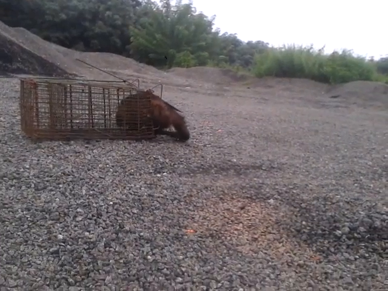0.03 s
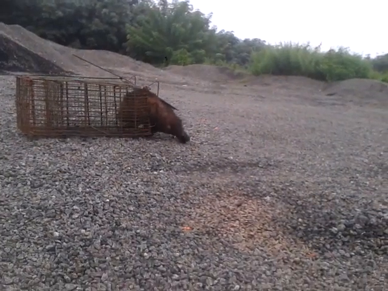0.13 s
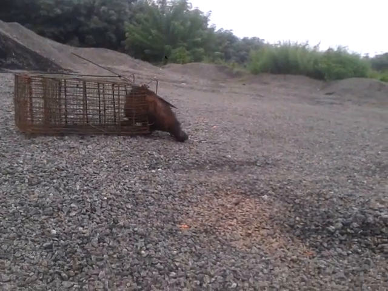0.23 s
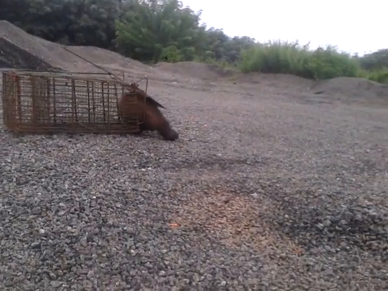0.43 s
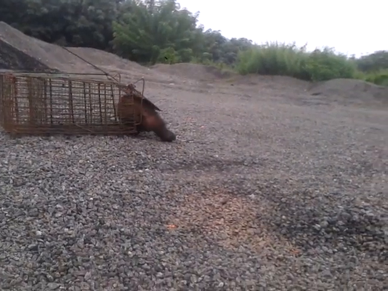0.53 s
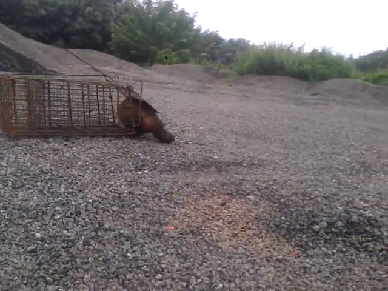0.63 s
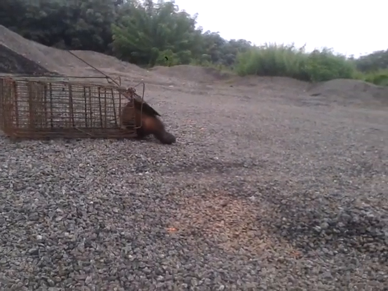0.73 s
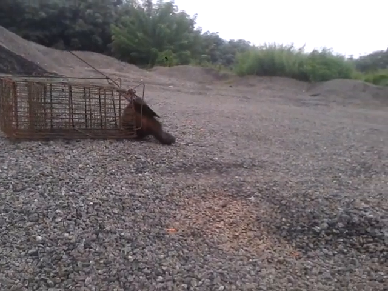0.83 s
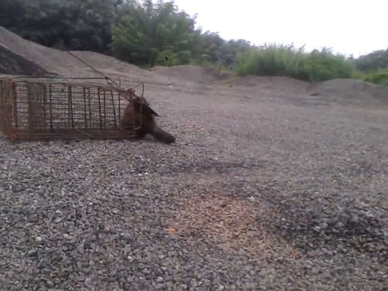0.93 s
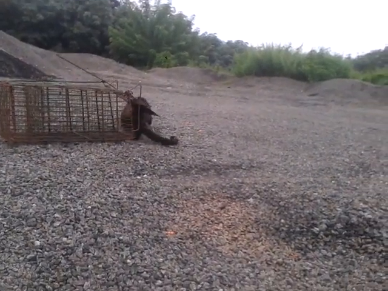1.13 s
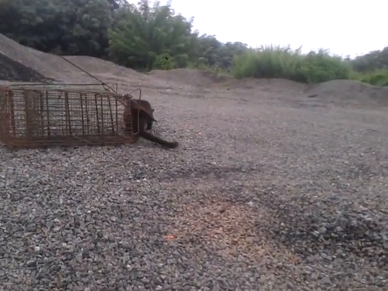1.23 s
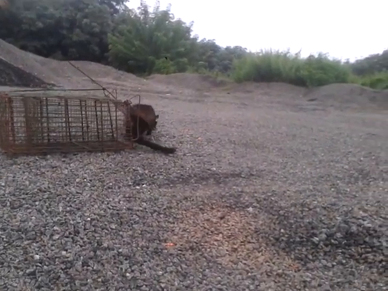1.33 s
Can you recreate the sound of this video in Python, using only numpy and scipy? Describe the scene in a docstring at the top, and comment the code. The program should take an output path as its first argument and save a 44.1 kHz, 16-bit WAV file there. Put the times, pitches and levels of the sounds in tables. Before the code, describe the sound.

An animal gives two thin, buzzing calls nearby, from about 0.2 to 0.5 seconds and 0.9 to 1.2 seconds. Each falls in pitch, joined by a higher tone near its end. A wire cage knocks lightly in the first 0.3 seconds, loudest at 0.5, and again near 1 second. Gravel clicks faintly throughout, over quiet outdoor hiss, faint insects and a distant low drone.

```python
"""On open gravel, by a wire cage, an animal gives two thin, buzzing, falling calls.
Each call is a tone chopped into fast pulses, joined near its end by a second, higher voice.
Knocks set the cage wire ringing, and the gravel shifts in tiny clicks of stone on stone.
Behind lie airy hiss, a distant drone, insects and a low rumble, all shaped from noise."""
import sys
import numpy as np
from scipy import signal
from scipy.fft import rfft, irfft
from scipy.io import wavfile
from scipy.ndimage import uniform_filter1d

SR = 44100
rng = np.random.default_rng(int(sys.argv[2]) if len(sys.argv) > 2 else 0)


def output_pcm(signal):
    """Save a mono or channel-first signal as 16-bit PCM at the path in sys.argv[1].

    Samples are clipped to [-1, 1] before scaling.
    """
    pcm = np.clip(np.atleast_2d(signal).T, -1, 1) * 32767
    wavfile.write(sys.argv[1], SR, np.round(pcm).astype(np.int16))


N = 61739

# tone colour of the open air: (frequency [Hz], relative level [dB])
AIR_COLOUR = [(25, -38), (60, -13.5), (120, -22.5), (220, -12), (320, -6), (450, 2.5), (650, -4.5),
              (900, -10.5), (1400, -7.5), (2300, -13.5), (4000, -12), (5600, -17), (7000, -17),
              (11500, -18.5), (15500, -15.5)]
# two bands of drone, then two of insects: (centre [Hz], width to each side [Hz], base level [dB])
BANDS = [(415.7, 12.8, -66), (328, 18, -72), (3054, 160, -68.5), (5090, 334, -66)]
# air, drone and insects swell together: (time [s], level change [dB])
SWELL = [(0, -4.5), (.15, -1.5), (.5, 0.13), (.7, -1.4), (1.0, 1), (1.4, -2.5)]
# the rumble's rise and fall: (time [s], level [dB])
RUMBLE_LEVELS = [(0, -66), (.14, -66), (.25, -77.5), (.47, -79.5), (.56, -69), (.82, -72.5), (.97, -79.5),
                 (1.119, -90), (1.2, -65), (1.28, -77.5), (1.4, -65.5)]
# knocks on the cage: (time [s], low [dB], middle [dB], high [dB], top [dB], ring against click [dB])
KNOCKS = [(0.101, -16, -16.5, -27.5, -34, -32), (0.1613, -22.5, -17, -31, -53, -26),
          (0.2689, -16, -19, -20, -30, -57), (.439, -40, -27, -23, -37, -45),
          (0.4891, -4.5, -9, -15, -30.5, -38), (0.963, -16, -14, -34, -55, -30)]
# points where a knock's tone colour is set: (frequency [Hz])
KNOCK_HZ = [60, 250, 450, 850, 1600, 2400, 3900, 4700, 5600, 8500, 13000]
# ringing notes of the wire: (pitch [Hz], relative level [dB], time to fade by 60 dB [s])
WIRE_NOTES = [(870, 3, 0.0059), (1507, 4, 0.02), (2320, -14, 0.0085), (4550, 9, 0.0075), (5100, -8, 0.057)]
# gravel shifts and soft rustles: (time [s], length [s], level [dB], strongest frequency [Hz])
SCUFFS = [(0.175, 0.012, -61, 3120), (0.478, 0.049, -82, 3000), (0.721, 0.01, -62.5, 2500),
          (0.809, 0.047, -64, 3700), (0.844, 0.028, -60, 820), (0.852, 0.025, -62, 2800),
          (1.035, 0.049, -64.5, 2330), (1.128, 0.023, -64.5, 2680), (1.276, 0.019, -60, 3220)]
# slides that open the calls: (time [s], length [s], first pitch [Hz], last pitch [Hz], level [dB])
SLIDES = [(0.193, 0.05, 1154, 1430, -59), (0.841, 0.056, 990, 1393, -61)]
# main voice of each call: (time [s], pitch [Hz], level [dB])
MAIN_A = [(.2239, 1483, -55), (.245, 1531, -39.5), (.262, 1506, -36.5), (.285, 1430, -31),
          (.32, 1396, -32.5), (.35, 1387, -34), (.39, 1333, -39.5), (.42, 1260, -46.5), (.445, 1200, -47.5),
          (.475, 1113, -52.5)]
MAIN_B = [(.8787, 1506, -52), (.899, 1489, -43), (.905, 1559, -38), (.94, 1417, -32.5), (.97, 1390, -32.5),
          (1.005, 1358, -34.5), (1.04, 1308, -39.5), (1.07, 1246, -42.5), (1.11, 1159, -50.5),
          (1.145, 1096, -50.5)]
# higher voice of each call: (time [s], pitch [Hz], level [dB])
UPPER_A = [(.35, 1989, -60), (.385, 1920, -65), (.41, 1822, -55), (.447, 1704, -48.5), (.46, 1572, -51),
           (.47, 1472, -41.5), (.481, 1463, -42.5), (.492, 1320, -72)]
UPPER_B = [(1.03, 1860, -55), (1.05, 1826, -57.5), (1.08, 1759, -53.5), (1.11, 1690, -50),
           (1.122, 1562, -51.5), (1.13, 1550, -45.5), (1.141, 1536, -47.5), (1.153, 1370, -61)]
# single stones tapping: (time [s], level [dB])
STONE_TAPS = [(.3238, -48), (.5749, -43.5)]
# ringing notes of a stone: (pitch [Hz], relative level [dB], time to fade by 60 dB [s])
STONE_NOTES = [(3400, -14, .009), (3850, -0.5, 0.0073), (4350, -8, 0.0095), (6040, -2, 0.0037)]

TIME = np.arange(N) / SR


def amp(db):
    """Turns decibels into a number to multiply a sound by."""
    return 10 ** (np.asarray(db) / 20)


def unit(x):
    """Scales a signal to an average strength (rms) of 1."""
    return x / np.sqrt(np.mean(x ** 2) + 1e-20)


def add(mix, start_s, sound):
    """Mixes a sound in at the given time."""
    part = mix[max(round(start_s * SR), 0):][:len(sound)]
    part += sound[:len(part)]


def coloured(x, gain):
    """Turns each frequency up or down by gain(frequency), then scales to strength 1."""
    freqs = np.fft.rfftfreq(len(x), 1 / SR) + 1
    return unit(irfft(rfft(x) * gain(freqs), len(x)))


def wander(rate_hz):
    """A smooth random wobble, up to about the given rate."""
    return coloured(rng.standard_normal(N), lambda f: 1 / (1 + (f / rate_hz) ** 4))


def level_curve(points):
    """Joins (time, level) points into a volume curve."""
    return amp(np.interp(TIME, *np.transpose(points)))


def noise_band(centre, width, db):
    """Noise gathered around one pitch."""
    return amp(db) * coloured(rng.standard_normal(N), lambda f: 1 / (1 + ((f - centre) / width) ** 2))


def air_hiss(level_db=-57.5, patch_db=2.5):
    """Open-air hiss, with patches that drift louder and softer."""
    freqs, _, spectrum = signal.stft(rng.standard_normal(N), SR, nperseg=1024)
    patches = uniform_filter1d(rng.standard_normal(spectrum.shape), size=10, axis=0)
    patches = unit(uniform_filter1d(patches, size=5, axis=1))
    hz, db = np.transpose(AIR_COLOUR)
    colour_db = np.interp(np.log(freqs + 1), np.log(hz), db)
    spectrum *= amp(colour_db[:, None] + patch_db * patches)
    return amp(level_db) * unit(signal.istft(spectrum, SR, nperseg=1024)[1][:N])


def drone():
    """A distant hum: two low, narrow bands of noise."""
    return sum(noise_band(*band) for band in BANDS[:2])


def insects():
    """Insects hiss in two high bands."""
    return sum(noise_band(*band) for band in BANDS[2:])


def rumble(centre_hz=195):
    """A low outdoor rumble comes and goes."""
    low = coloured(rng.standard_normal(N), lambda f: 1 / (1 + np.log2(f / centre_hz) ** 4))
    return low * level_curve(RUMBLE_LEVELS)


def gravel_grains(per_s, hz, width_octaves=0.68):
    """Tiny stones of uneven size click at random moments."""
    clicks = rng.standard_normal(N) * (rng.random(N) < per_s / SR)
    return coloured(clicks, lambda f: 1 / (1 + (np.log2(f / hz) / width_octaves) ** 2))


def cage_knock(low, middle, high, top, ring_db, lead_in_s, size=4096):
    """A dull click, smeared by a brief rattle, sets the cage wire ringing."""
    rattle_s, delay_at_1khz_s, bounce_s = 0.0013, 0.000484, 0.00092
    t, signed_hz = TIME[:size], np.fft.fftfreq(size, 1 / SR)
    freqs = abs(signed_hz) + 1
    # one level for each point in KNOCK_HZ
    levels = [low - 49, low - 5.5, low + 1.5, low, (low + middle) / 2 - 7,
              middle, high - 2, high, top + 2, top, top - 15]
    colour_db = lambda hz: np.interp(np.log(hz), np.log(KNOCK_HZ), levels)
    # the most sudden click that has this tone colour
    spectrum = np.exp(np.conj(signal.hilbert(np.log(amp(colour_db(freqs))))))
    # waves bend the wire as they travel, and the treble arrives first
    lag = 4 * np.pi * delay_at_1khz_s * np.sqrt(1000 * freqs) * np.sign(signed_hz)
    rattle = rng.standard_normal(size) * np.exp(-t / rattle_s)
    smear = np.angle(1 + amp(-4) * np.fft.fft(rattle) / np.linalg.norm(rattle))
    click = np.fft.ifft(spectrum * np.exp(1j * (smear - lag))).real
    click = click + amp(-17) * np.roll(click, round(bounce_s * SR))  # sound bouncing off the ground
    ring = sum(amp(colour_db(hz) + ring_db + db - 60 * t / fade_s) * np.sin(2 * np.pi * hz * t)
               for hz, db, fade_s in WIRE_NOTES)
    sound = np.roll(click + ring, round(lead_in_s * SR))
    bass_cut = signal.butter(2, 317, "high", fs=SR, output="sos")  # the lowest bass is cut from the knock
    return signal.sosfilt(bass_cut, sound)


def echo(x, level_db=-19, fade_s=0.8, delay_s=0.016):
    """Gravel banks and trees scatter a little sound back."""
    tail = rng.standard_normal(N) * (TIME > delay_s) * amp(-60 * TIME / fade_s)
    return amp(level_db) * signal.fftconvolve(x, tail / np.linalg.norm(tail))[:N]


def gravel_scuff(length, db, hz):
    """Shifting gravel makes a short swell of packed clicks."""
    swell = np.hanning(round(length * SR))
    return amp(db) * unit(gravel_grains(per_s=5000, hz=hz)[:len(swell)] * swell)


def whistle(hz, rough=0.24, rasp_width_hz=342):
    """The animal's tone: a slightly unsteady whistle with rasp around it."""
    phase = 2 * np.pi * np.cumsum(hz * (1 + 0.003 * wander(64))) / SR
    rasp = wander(rasp_width_hz) * np.sin(phase) + wander(rasp_width_hz) * np.cos(phase)
    return np.sin(phase) + rough * rasp / np.sqrt(2)


def opening_slide(start, length, from_hz, to_hz, db):
    """The voice slides faintly upward as it starts."""
    progress = np.clip((TIME - start) / length, 0, 1)
    return amp(db) * np.sin(np.pi * progress) * whistle(from_hz + (to_hz - from_hz) * progress)


def voice_path(points, fade_s=0.0019):
    """Gives a voice's time since its start, its pitch and its volume."""
    times, hz, db = np.transpose(points)
    fade_in = np.clip((TIME - times[0]) / fade_s, 0, 1)
    fade_out = np.clip((times[-1] - TIME) / fade_s, 0, 1)
    gain = fade_in * fade_out * amp(np.interp(TIME, times, db))
    return np.maximum(TIME - times[0], 0), np.interp(TIME, times, hz), gain


def animal_call(main_points, upper_points, pulse_hz=94.8):
    """A falling tone is chopped into chirps; the same pulsing shakes a higher voice."""
    settle_s, tire_s, shake_ends_s = 0.049, 0.2, 0.25
    age, hz, gain = voice_path(main_points)
    started = age > 0
    early = np.exp(-(age / settle_s) ** 2)
    late = np.minimum(age / tire_s, 1) ** 4  # the voice grows rougher as effort runs out
    pulse_rate = started * pulse_hz * (1 + 0.007 * wander(35))
    cycle = np.cumsum(pulse_rate) / SR % 1  # runs from 0 to 1 in each pulse
    arch = np.sin(np.pi * cycle ** 1.3)  # each pulse swells slowly and shuts quickly
    arch_hz = 176.15 + 60.12 * early + 91 * late
    hz = hz + arch_hz * (arch - arch[started].mean())
    hz = hz + 783.7 * early * (0.5 - cycle)  # early pulses also chirp downward
    gap_gain = 0.4 * (1 - early)
    pulses = gap_gain + (1 - gap_gain) * abs(arch) ** (0.85 + 0.25 * early)
    main = gain * pulses * whistle(hz, rough=0.09 + 0.28 * early + 0.22 * late)

    _, upper_hz, upper_gain = voice_path(upper_points)
    flutter, swing_hz = 0.64, 58
    shake = np.cos(2 * np.pi * cycle) / (1 + (age / shake_ends_s) ** 20)  # eases off at the end
    upper = upper_gain * (1 + flutter * shake) * whistle(upper_hz - swing_hz * shake)
    bass_cut = signal.butter(8, 990, "high", fs=SR, output="sos")  # keeps the call thin
    return signal.sosfiltfilt(bass_cut, main + upper)


def stone_tap(level_db, rise_s=0.00011):
    """One stone taps another and rings for a few thousandths of a second."""
    t = TIME[:2048]
    ring = sum(amp(db - 60 * t / fade_s) * np.sin(2 * np.pi * (hz * t + rng.random()))
               for hz, db, fade_s in STONE_NOTES)
    return amp(level_db) * np.minimum(t / rise_s, 1) * ring


def scene():
    """Mixes the nearby calls, cage and gravel with their echo and the background."""
    near = animal_call(MAIN_A, UPPER_A) + animal_call(MAIN_B, UPPER_B)
    near += sum(opening_slide(*row) for row in SLIDES)
    near += amp(-74) * gravel_grains(per_s=130, hz=4100)  # faint grit all the way through
    background = (air_hiss() + drone() + insects()) * level_curve(SWELL) + rumble()
    lead_in_s = 0.004  # room before each knock for its smeared start
    for start, *levels in KNOCKS:
        add(near, start - lead_in_s, cage_knock(*levels, lead_in_s))
    for start, level_db in STONE_TAPS:
        add(near, start, stone_tap(level_db))
    for start, *shape in SCUFFS:
        add(near, start, gravel_scuff(*shape))
    return (near + echo(near) + background)[None]


def record(dry):
    """Cuts away the very highest treble."""
    treble_cut = signal.firwin(511, 15850, window=("kaiser", 9), fs=SR)
    return signal.oaconvolve(dry, treble_cut[None], "same")


dry = scene()
out = record(dry)
output_pcm(out)
```